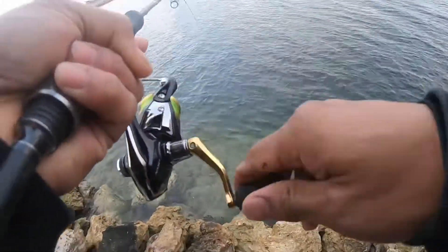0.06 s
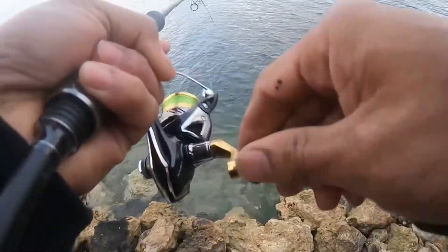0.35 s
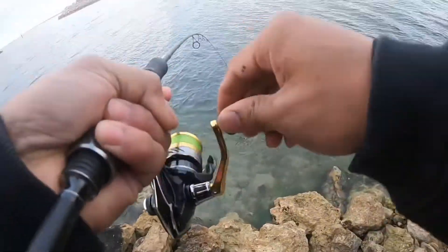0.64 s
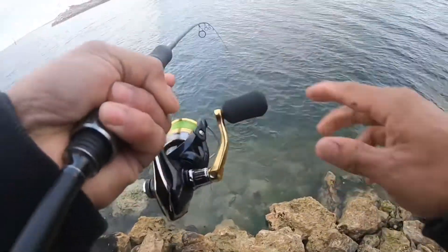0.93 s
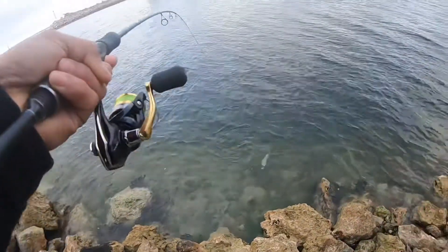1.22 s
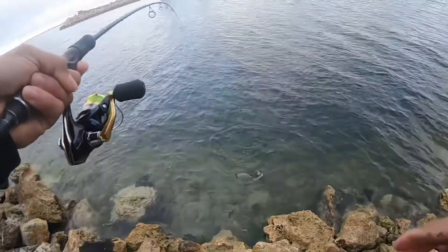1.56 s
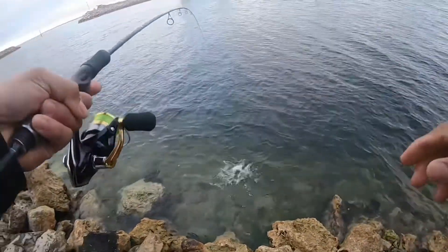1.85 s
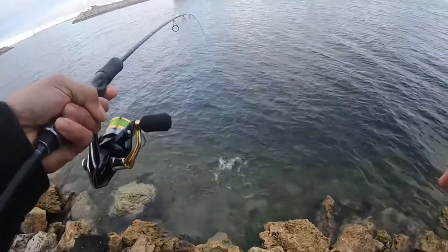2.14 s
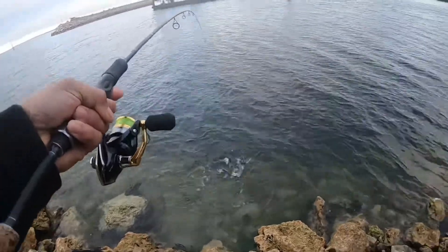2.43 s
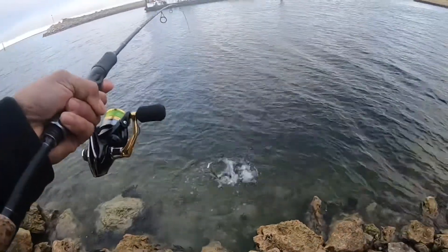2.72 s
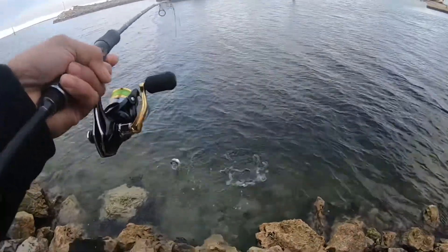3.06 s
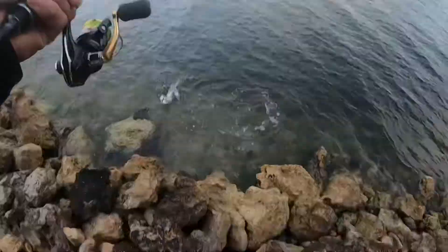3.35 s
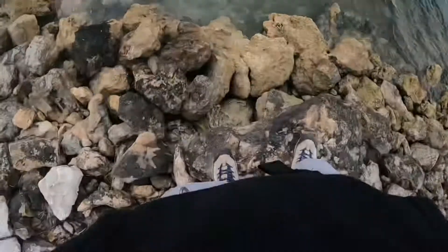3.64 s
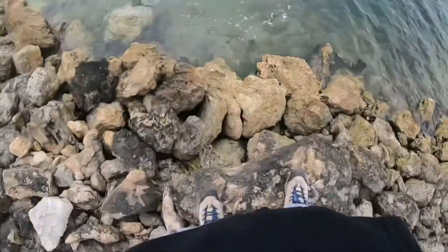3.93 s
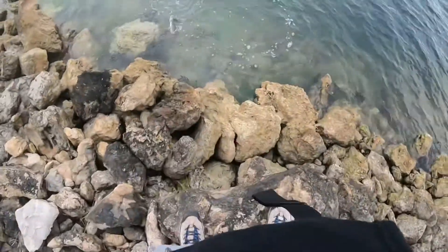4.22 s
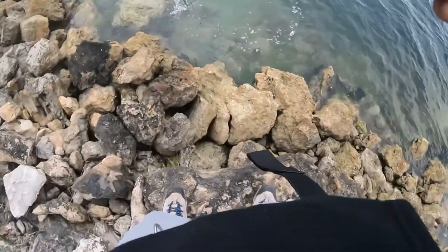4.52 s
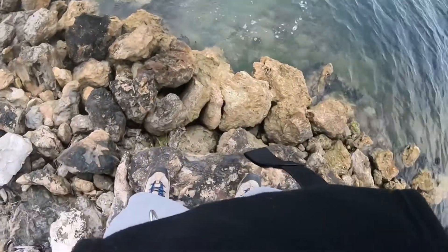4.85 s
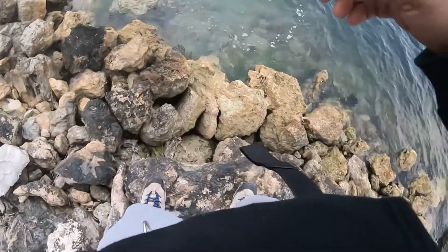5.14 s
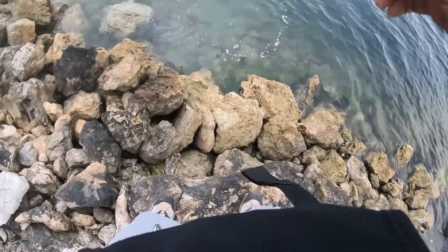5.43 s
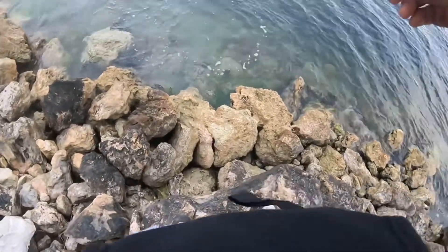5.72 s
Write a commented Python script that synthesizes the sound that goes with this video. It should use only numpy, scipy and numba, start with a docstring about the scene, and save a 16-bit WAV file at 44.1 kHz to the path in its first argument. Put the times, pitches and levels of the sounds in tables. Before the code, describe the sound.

Wind thumps and rumbles unevenly on a body-worn microphone at the water's edge. A fishing reel ticks and whirrs for under a second, followed by a brief rub of a sleeve or hand. A fish then splashes repeatedly just below, with spray and plops. After one sharp, hollow gulp among the rocks, small waves keep sloshing and trickling more softly.

```python
"""A rocky shore: an angler winds a spinning reel a few clicks, then a hooked fish thrashes at the surface.
The pawl excites damped modes of the reel. The water sounds by impact and by the resonance of trapped
air: slaps, spray and bubbles, and gulps in a hollow between the stones. Turbulent wind buffets a
body-worn microphone with low swings of pressure, and a sleeve or hand rubs briefly."""
import sys
import numpy as np
from scipy import signal
from scipy.fft import rfft, irfft, next_fast_len
from scipy.io import wavfile
from scipy.ndimage import uniform_filter1d, minimum_filter1d
from numba import njit

SR = 44100
rng = np.random.default_rng(int(sys.argv[2]) if len(sys.argv) > 2 else 0)


def dump_mix(stems):
    """Bounce the given channels to the path in sys.argv[1] as a 16-bit WAV at rate SR."""
    frames = np.atleast_2d(stems).T  # one column per channel
    limited = np.clip(frames, -1, 1)  # hard clip at full scale
    pcm = np.round(limited * 32767).astype(np.int16)
    wavfile.write(sys.argv[1], SR, pcm)


N = 259115
TIME = np.arange(N) / SR

# modes of the air in a hollow between the stones: pitch_hz, level_db, t60_s
HOLLOW_MODES = [(935, -11.5, 0.11), (1255, 0, 0.049), (1374, -1.5, 0.05), (1579, -1, .12),
                (1701, 1.5, 0.034), (1897, -8.5, .1), (2005, -6, 0.14), (2090, -10.5, .1), (3030, -29, .1)]


def undb(db):
    """Decibels to amplitude ratio."""
    return 10 ** (np.asarray(db) / 20)


def unit(x):
    """Normalise to rms 1."""
    return x / np.sqrt(np.mean(x ** 2))


def curves(table):
    """Linear interpolation of each column to every sample; the first column is time."""
    times_s, *columns = np.transpose(table)
    return [np.interp(TIME, times_s, column) for column in columns]


def colour(x, points):
    """Minimum-phase filter through (Hz, dB) points, falling 20 dB an octave beyond the ends."""
    size = 2 * next_fast_len(len(x) // 2 + 2048)
    hz, db = np.transpose(points)
    octave = np.log2(np.maximum(np.arange(size // 2 + 1) * SR / size, 1))
    outside = np.abs(octave - np.clip(octave, np.log2(hz[0]), np.log2(hz[-1])))
    gain = undb(np.interp(octave, np.log2(hz), db) - 20 * outside)
    cepstrum = irfft(np.log(gain))
    cepstrum[1:size // 2] *= 2  # folding the cepstrum makes the filter causal
    cepstrum[size // 2 + 1:] = 0
    return irfft(rfft(x, size) * np.exp(rfft(cepstrum)))[:len(x)]


def add(out, start_s, sound, peak_db):
    """Superpose a sound at the given time and peak level."""
    i = int(start_s * SR)
    out[i:i + len(sound)] += (undb(peak_db) * sound / np.abs(sound).max())[:N - i]


def flutter(rate_hz):
    """Random modulation of rms 1: sample-and-hold noise, smoothed twice."""
    hold = max(int(SR / rate_hz), 2)
    steps = np.repeat(rng.standard_normal(N // hold + 1), hold)
    return unit(uniform_filter1d(uniform_filter1d(steps, hold), hold)[:N])


def steady(x, span_s):
    """Division by the running rms evens out slow changes of level; faster detail stays."""
    span = int(span_s * SR)
    return x / np.sqrt(uniform_filter1d(uniform_filter1d(x ** 2, span), span) + 1e-12)


def swell(start_s, hold_s, attack_s, release_s):
    """Envelope: a linear rise ending at start_s, a hold, then exponential decay."""
    rise = np.clip(1 + (TIME - start_s) / attack_s, 0, 1)
    return rise * np.exp(-np.clip((TIME - start_s - hold_s) / release_s, 0, 20))


def strengths(background, events, attack_s, release_s):
    """Incoherent sources add in power: each layer's gain from its background and its swells."""
    power = undb(curves(background)) ** 2
    for start_s, hold_s, *layers_db in events:
        envelope = swell(start_s, hold_s, attack_s, release_s)
        power = power + np.outer(undb(layers_db) ** 2, envelope ** 2)
    return np.sqrt(power)


def wind_and_rub():
    """Turbulence at the microphone port: slow pressure swings and fast eddies, with one brief rub."""
    # noise spectra: frequency_hz, density_db
    buffet_spectrum = [(11, -31.5), (18, -0.5), (49, 6), (103, 0.5), (166, -7.5), (260, -21), (340, -36),
                       (570, -120)]
    eddy_spectrum = [(90, -15), (160, 2), (230, -5), (330, -9), (500, -18.5), (900, -31), (2000, -68.5)]
    # light background air: time_s, buffet_db, eddy_db
    breeze = [(0, -25.5, -32.5), (0.75, -24.5, -44.5), (1.15, -32.5, -44.5), (1.33, -44, -49.5),
              (1.6, -33, -46), (2.0, -19.5, -28), (2.6, -25, -33.5), (3.2, -27, -43.5), (4.1, -26.5, -40),
              (4.6, -30, -50), (5.3, -31, -57), (5.88, -26, -48)]
    # gusts, and a brief rub of sleeve or hand near 0.9 s: start_s, hold_s, buffet_db, eddy_db
    gusts_and_rub = [(0.0, 0.045, -17.5, -26), (0.158, 0.27, -23, -32.5), (0.479, 0.069, -10, -22.5),
                     (0.59, 0.055, -13.5, -31.5), (0.83, 0.067, -14, -28), (0.902, 0.14, -44, -22),
                     (1.457, 0.029, -27, -36), (1.558, 0.068, -26.5, -34.5), (1.649, 0.028, -17, -24.5),
                     (1.709, 0.022, -14.5, -19.5), (1.809, 0.056, -17, -18), (1.898, 0.083, -11.5, -18.5),
                     (2.119, 0.16, -22, -25), (2.3, 0.13, -25.5, -28), (2.672, 0.11, -19.5, -30.5),
                     (2.847, 0.16, -20.5, -29.5), (3.365, 0.15, -21.5, -32.5), (3.602, 0.052, -23, -32.5),
                     (3.809, 0.054, -19.5, -28), (3.908, 0.016, -21.5, -20), (3.968, .1, -22.5, -42),
                     (4.22, 0.094, -21, -26), (4.316, 0.16, -19, -23.5), (4.634, 0.038, -19, -45),
                     (4.748, 0.014, -28, -29.5), (4.783, 0.11, -24.5, -42), (5.004, 0.072, -23.5, -40),
                     (5.235, 0.034, -30, -39), (5.559, 0.0091, -29.5, -39.5), (5.784, 0.12, -21.5, -25)]
    buffet_gain, eddy_gain = strengths(breeze, gusts_and_rub, attack_s=0.027, release_s=0.02)
    buffet = steady(colour(rng.standard_normal(N), buffet_spectrum), span_s=0.097)
    turbulence = rng.standard_normal(N) * undb(4.8 * flutter(rate_hz=60))
    eddies = steady(colour(turbulence, eddy_spectrum), span_s=0.046)
    return buffet * buffet_gain + eddies * eddy_gain


def puffs():
    """A single eddy hits the port as a pressure pulse: one or two swings under a Gaussian envelope."""
    # eddy impacts: centre_s, peak_db, pitch_hz
    impacts = [(0.496, -11, 76.6), (0.516, -11, 81), (0.615, -14, 100), (0.636, -7.5, 80.4),
               (0.861, -10, 126), (0.888, -4.5, 60), (1.725, -5.5, 112), (1.814, -1.5, 149),
               (1.93, -6, 154), (1.955, -1.5, 71), (2.117, -5, 119), (2.211, -8.5, 122),
               (3.011, -11.5, 132), (3.646, -10, 166), (4.314, -7, 156), (4.457, -9.5, 91),
               (5.436, -9.5, 54), (5.796, -13, 133)]
    out, t = np.zeros(N), TIME[:SR // 10] - .05
    for centre_s, peak_db, hz in impacts:
        swing = np.sin(2 * np.pi * (hz * t + rng.random())) * np.exp(-(t * hz / 0.66) ** 2)
        add(out, centre_s + t[0], swing, peak_db)
    return out


@njit
def ring_bubbles(starts, hz, cycles, sizes, rise):
    """Each bubble is a damped oscillator whose pitch climbs as it nears the surface."""
    out = np.zeros(N)
    for k in range(len(starts)):
        length, phase = int(cycles[k] * SR / hz[k]) + 2, 0.
        size, fall = sizes[k], np.exp(-5 / length)
        for i in range(min(length, N - starts[k])):
            phase += 2 * np.pi * hz[k] * (1 + rise * i / length) / SR
            out[starts[k] + i] += size * np.sin(phase)
            size *= fall
    return out


def froth(low_hz, high_hz, cycles, spread_db, rise, count):
    """Random superposition of ringing bubbles and droplets: many faint, a few strong."""
    when, pitch, life, size = rng.random((count, 4)).T
    starts = (when * N).astype(np.int64)
    hz = low_hz + (high_hz - low_hz) * pitch
    sizes = undb(spread_db * np.minimum(-np.log(1 - size), 5)) * np.sqrt(hz)
    return unit(ring_bubbles(starts, hz, cycles * 2 ** (2 * life - 1), sizes, float(rise)))


def churn():
    """Bubble resonance gurgles and drop impact gives spray and fizz, all in the same quick spurts."""
    # water spectra: frequency_hz, density_db
    gurgle_spectrum = [(250, -20.5), (450, 3.5), (650, 3), (950, 1.5), (1350, 0), (1800, -8.5), (2500, -19),
                       (4000, -37)]
    spray_spectrum = [(1000, -22.5), (1800, -1.5), (2300, -1.5), (3100, 4.5), (3700, -1), (4400, -5),
                      (5300, -14.5), (6500, -17.5), (8500, -41.5)]
    fizz_spectrum = [(3800, -25.5), (4800, 6.5), (5500, 3.5), (6100, 0), (6900, 4), (7700, -4.5),
                     (9000, -2), (10200, -12), (11200, -11), (13000, -21.5), (15500, -33)]
    # lapping, livelier once the fish has stirred the water: time_s, gurgle_db, spray_db, fizz_db
    lapping = [(0, -40, -62, -73), (0.4, -40.5, -48.5, -73), (0.72, -45, -57, -62), (0.95, -39.5, -48, -61),
               (1.3, -47, -58.5, -71), (1.5, -45, -51.5, -70), (1.75, -36.5, -33, -47.5),
               (2.3, -44, -39.5, -58), (2.8, -47, -46, -43.5), (3.65, -41, -41.5, -49.5),
               (4.45, -48, -44.5, -57), (5.0, -48.5, -44.5, -53.5), (5.5, -56.5, -48, -55),
               (5.88, -43, -50, -49.5)]
    # the fish's splashes, then wavelets on the stones: start_s, hold_s, gurgle_db, spray_db, fizz_db
    splashes = [(1.555, 0.036, -36, -40, -60), (1.625, .025, -37, -38, -52),
                (1.678, 0.043, -29, -33.5, -42.5), (1.823, 0.033, -36, -41, -58),
                (1.906, 0.046, -26, -32.5, -50), (2.13, 0.044, -39.5, -37, -59),
                (2.386, 0.097, -38, -31.5, -51.5), (2.544, 0.14, -31.5, -29, -45.5),
                (2.656, .28, -34, -30.5, -43.5), (3.032, .02, -38, -41, -42),
                (3.105, 0.094, -40.5, -35, -44), (3.218, 0.079, -36, -31, -43),
                (3.293, .14, -32, -30.5, -36.5), (3.467, 0.14, -44, -38, -45.5),
                (3.766, 0.043, -37.5, -38, -45), (3.9, .09, -42, -40, -47.5), (4.064, 0.021, -59, -41, -41),
                (4.15, 0.095, -44, -35.5, -45), (4.266, 0.022, -36, -33, -37.5),
                (4.35, 0.054, -40, -37.5, -51), (4.479, 0.06, -35.5, -46, -59),
                (4.836, 0.07, -49, -37, -40), (5.05, 0.097, -57, -39.5, -41.5),
                (5.226, 0.098, -46, -35.5, -38.5), (5.36, 0.035, -47, -42, -44),
                (5.626, 0.07, -51, -51, -55)]
    gurgle_gain, spray_gain, fizz_gain = strengths(lapping, splashes, attack_s=0.03, release_s=0.023)
    spurts = undb(2.42 * flutter(rate_hz=70))
    bubbles = froth(350, 2400, cycles=12, spread_db=3.8, rise=.25, count=3400)
    bubbles += .5 * rng.standard_normal(N)
    drops = froth(1200, 12000, cycles=12, spread_db=3.8, rise=.1, count=20000)
    crackle = unit(rng.standard_normal(N) * undb(0.95 * flutter(rate_hz=900)))  # drops strike the surface
    patter = drops + .8 * crackle
    layers = [(bubbles, gurgle_spectrum, gurgle_gain),
              (patter, spray_spectrum, spray_gain),
              (patter, fizz_spectrum, fizz_gain)]
    return sum(steady(colour(x * spurts, shape), span_s=0.092) * gain for x, shape, gain in layers)


def hollow():
    """Cavity resonance: surges drive each mode with its own noise, most strongly near their pitch."""
    # surges between the stones: start_s, hold_s, level_db, pitch_hz
    surges = [(1.65, 0.27, -42.5, 1210), (2.526, 0.23, -41.5, 1700), (3.272, 0.21, -31.5, 1240),
              (3.894, 0.018, -37.5, 1750), (4.216, 0.019, -22, 1400), (4.267, 0.02, -22, 1690)]
    rest_db, rest_hz = -54.5, 1300  # the murmur between surges
    power = undb(rest_db) ** 2
    weighted_hz = power * rest_hz
    for start_s, hold_s, db, hz in surges:
        surge_power = (undb(db) * swell(start_s, hold_s, attack_s=0.017, release_s=0.017)) ** 2
        power = power + surge_power
        weighted_hz = weighted_hz + surge_power * hz
    focus_hz = weighted_hz / power
    out = np.zeros(N)
    for hz, db, t60_s in HOLLOW_MODES:
        radius = undb(-60 / (t60_s * SR))
        resonator = [1, -2 * radius * np.cos(2 * np.pi * hz / SR), radius ** 2]
        ring = signal.lfilter([1, 0, -1], resonator, rng.standard_normal(N))
        out += unit(ring) * undb(db) / (1 + (np.log2(hz / focus_hz) / 0.46) ** 2)
    murmur = colour(out, [(600, -20), (900, -1.5), (2200, 2.0), (5000, -23)])
    return steady(murmur, span_s=0.035) * np.sqrt(power)


def gulp():
    """Impulsive excitation: trapped air sounds all the modes of the hollow in one short, loud gulp."""
    start_s, length_s = 4.2205, 0.012
    out, t = np.zeros(N), TIME[:SR // 10] - .04
    hz, db, _ = np.transpose(HOLLOW_MODES)[:, :, None]
    modes = np.sum(undb(db) * np.exp(2j * np.pi * (hz * t + rng.random(hz.shape))), axis=0)
    even = modes.real / np.sqrt(np.abs(modes) ** 2 + 0.65)  # held at an even level
    from_centre = np.abs(2 * t / length_s - 1)
    envelope = np.exp(-from_centre ** 4) + 0.17 * np.exp(-from_centre / 2.4)  # holds, then dies away
    add(out, start_s + t[0], envelope * even, peak_db=-1.5)
    return out


def stone_echoes(x):
    """Diffuse reflection: the boulders add a short scatter of echoes to the direct sound."""
    t60_s, t = 0.14, TIME[:SR // 5]
    echoes = rng.standard_normal(len(t)) * undb(-60 * t / t60_s) * (t > .005)
    return x + undb(-14.5) * signal.fftconvolve(x, echoes / np.linalg.norm(echoes))[:N]


def whirr():
    """Friction noise: line slides over the roller and the gears mesh in a soft, grainy whirr."""
    # spectrum of gears and line: frequency_hz, density_db
    spectrum = [(900, -6), (1300, -16), (1700, -12), (2520, -4), (3200, -3), (3800, -5), (4400, -11),
                (5600, -18.5), (7200, -23.5), (9200, -26), (12000, -44)]
    # loudness as the handle turns: time_s, level_db
    winding = [(0, -60), (0.1, -64), (0.21, -46), (0.3, -44.5), (0.5, -42), (0.64, -39.5), (0.71, -47.5),
               (0.85, -63), (1.0, -95)]
    rub = rng.standard_normal(N) * undb(4.1 * flutter(rate_hz=150.4))
    return unit(colour(rub, spectrum)) * undb(curves(winding)[0])


def ratchet():
    """Free vibration after impact: the pawl snaps over a tooth with a tick, pings and a spool tone."""
    # snaps of the pawl: start_s, peak_db, treble_db (relative; sets the tick and the modes above 8 kHz)
    snaps = [(0.197, -16.5, -34), (0.367, -19, -34), (0.4214, -15.5, -28), (0.465, -19.5, -23),
             (0.506, -23.5, -19), (0.545, -22, -24), (0.5826, -26, -11), (0.615, -23, -13),
             (0.6436, -24, -11), (0.6696, -23, -20), (0.7415, -17, -33)]
    # modes of pawl and housing: pitch_hz, level_db, t60_s
    modes = [(5390, 1.5, 0.017), (5660, 3.5, 0.018), (6160, -19, .008), (8340, -24, 0.11),
             (9000, -12.5, 0.032), (9700, -12, 0.023), (10100, -27, .006)]
    # spectrum of the tick: frequency_hz, density_db
    tick_spectrum = [(3500, -21), (4800, -9), (6000, 1), (7800, 0), (10400, 0), (11600, -20), (15000, -37)]
    spool_hz, spool_db, spool_t60_s = 3800, -29, 0.055
    out, t = np.zeros(N), TIME[:SR // 5]
    hz, db, t60_s = np.transpose(modes)[:, :, None]
    for start_s, peak_db, treble_db in snaps:
        detune = 1 + 0.00025 / t60_s * rng.standard_normal(hz.shape)  # the shortest modes vary most
        gains = undb(db + (hz > 8000) * (treble_db + 22.5))
        pings = np.sum(gains * undb(-60 * t / t60_s) * np.sin(2 * np.pi * hz * detune * t), axis=0)
        tick = colour(rng.standard_normal(len(t)) * np.exp(-t / 0.00057), tick_spectrum)
        add(out, start_s, pings + undb(treble_db + 25) * tick, peak_db)
        spool = undb(-60 * t / spool_t60_s) * np.sin(2 * np.pi * (spool_hz * t + rng.random()))
        add(out, start_s, spool, spool_db)
    return out


def plops():
    """Bubble resonance: a large bubble pinches off and rings, rising in pitch, with a wet edge of noise."""
    # single bubbles: start_s, peak_db, nominal_pitch_hz, decay_ms
    bubbles = [(0.834, -20, 1330, 3.9), (1.133, -24, 650, 5.3), (1.223, -29.5, 1380, 2.9),
               (1.309, -29, 975, 7.1), (1.552, -26.5, 1030, 10), (1.595, -21, 890, 3.9),
               (1.623, -18.5, 1910, 4.9), (1.679, -18, 940, 5.6), (1.836, -12, 960, 4),
               (1.886, -12.5, 450, 2.8), (1.918, -8, 440, 3.4), (2.135, -12.5, 560, 2.4),
               (2.542, -21.5, 1290, 5.4), (2.839, -17, 761, 7.9), (2.944, -18, 1580, 5.6),
               (3.045, -21, 1180, 2.6), (3.215, -19.5, 637, 7.8), (3.295, -7.5, 478, 8.4),
               (3.418, -22, 1330, 9.2), (3.466, -18.5, 1450, 3.7), (3.521, -21.5, 495, 13),
               (3.782, -18, 755, 2.9), (3.91, -9, 555, 2.1), (3.914, -9, 1730, 2.8), (4.052, -24, 498, 2.1),
               (4.271, -8.5, 1570, 4.7), (4.322, -18.5, 1263, 5.9), (4.367, -21, 583, 3.8),
               (4.484, -15.5, 420, 4), (4.515, -20, 693, 6), (4.583, -23.5, 870, 3.2),
               (4.639, -25.5, 960, 4.3), (4.863, -20.5, 1145, 4.9), (5.24, -24, 1080, 3.5),
               (5.404, -16.5, 1310, 3.6), (5.565, -30.5, 855, 4.6), (5.608, -27, 1096, 4.5)]
    out, t = np.zeros(N), TIME[:SR // 10]
    glide = 0.954 + 0.26 * (1 - np.exp(-t / 0.026))
    for start_s, peak_db, hz, decay_ms in bubbles:
        envelope = (1 - np.exp(-t / 0.0011)) * np.exp(-t * 1000 / decay_ms)
        tone = np.sin(2 * np.pi * hz * np.cumsum(glide) / SR)
        wet = unit(colour(rng.standard_normal(len(t)), [(hz / 2, -6), (hz, 0), (2 * hz, -8)]))
        add(out, start_s, envelope * (tone + undb(-7.5) * wet), peak_db)
    return out


def slaps():
    """Impact noise: a sheet of water closes in a spatter, boosted at the resonance of the air it traps."""
    # slaps of water: time_s, peak_db, pitch_hz, width_ms
    impacts = [(0.833, -22.5, 2360, 3.1), (1.134, -26.5, 1320, 3.8), (1.185, -27, 2670, 4.3),
               (1.422, -30, 4200, 4), (1.545, -24, 3370, 3.4), (1.641, -14.5, 3490, 4.5),
               (1.714, -16, 3420, 9), (1.887, -14.5, 2980, 5.1), (1.958, -6.5, 2840, 4.7),
               (2.032, -14, 3300, 7), (2.141, -22, 2880, 9.2), (2.226, -22.5, 2820, 5.5),
               (2.545, -15, 3200, 10), (2.676, -11.5, 3200, 5), (2.749, -15.5, 2600, 10),
               (2.947, -9, 1620, 5.7), (3.027, -17.5, 3600, 7.7), (3.095, -13.5, 3130, 4.6),
               (3.131, -14.5, 3230, 3.9), (3.178, -13, 3050, 3.3), (3.211, -13, 3240, 3.5),
               (3.298, -10.5, 2920, 7.3), (3.694, -19.5, 2880, 8.4), (3.826, -18, 2860, 4),
               (3.911, -15.5, 2420, 3.8), (3.995, -20, 2340, 8.4), (4.067, -21.5, 3000, 6.2),
               (4.15, -16.5, 2800, 5.2), (4.272, -12, 1900, 4), (4.285, -15, 3520, 6.4),
               (4.300, -14.5, 6050, 1.7), (4.348, -13, 3030, 1.7), (4.598, -23.5, 3550, 14.5),
               (4.719, -19, 2500, 5), (4.816, -15.5, 5370, 2.8), (4.865, -20, 4140, 3.7),
               (5.037, -22, 2760, 8.6), (5.143, -19, 5000, 4.7), (5.275, -12.5, 3570, 1.9),
               (5.288, -17, 2990, 2.3), (5.384, -19, 4070, 4.8), (5.4047, -11.5, 1980, 2.04),
               (5.510, -25.5, 2620, 9.8), (5.842, -24.5, 3030, 1.4)]
    # spectrum of the spatter: frequency_hz, density_db
    spectrum = [(300, -0.5), (700, -5.5), (1400, 4.5), (3100, 7.5), (4400, 4.5), (5500, 2), (7000, -4),
                (9000, -7.5), (11500, -27.5), (15500, -37)]
    out, t = np.zeros(N), TIME[:SR // 10] - .03
    hz, db = np.transpose(spectrum)
    stray_drops = undb(-25) * np.exp(-np.abs(t) / 0.0042)
    for time_s, peak_db, pitch_hz, width_ms in impacts:
        resonance_db = 11 * np.exp(-(np.log2(hz / pitch_hz) / 0.48) ** 2)
        age = t * 1000 / width_ms - .45  # in widths from the crest
        crest = np.exp(-np.abs(age) * np.where(age < 0, 3.2, 1.3))  # fast rise, slower fall
        burst = rng.standard_normal(len(t)) * (crest + stray_drops)
        spatter = colour(burst, np.column_stack([hz, db + resonance_db]))
        add(out, time_s + t[0], spatter, peak_db)
    return out


def scene():
    """Superposition in one channel: wind and reel at the microphone, water among the stones below."""
    reel = ratchet() + whirr()
    water = churn() + hollow() + gulp() + stone_echoes(slaps() + plops())
    return (wind_and_rub() + puffs() + reel + water)[None]


def record(dry):
    """Peak limiting ducks whatever passes full scale; a steep low-pass cuts the top."""
    window, top_hz = SR // 150, 15700
    needed_gain = 1 / np.maximum(np.abs(dry), 1)
    gain = uniform_filter1d(minimum_filter1d(needed_gain, window), window)
    return signal.sosfilt(signal.ellip(8, .2, 70, top_hz, fs=SR, output="sos"), dry * gain)


dry = scene()
out = record(dry)
dump_mix(out)
```